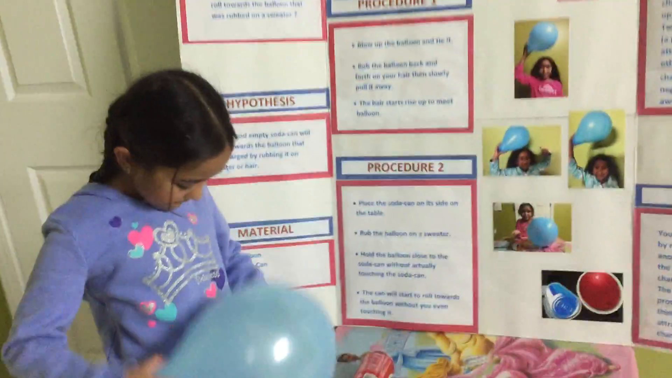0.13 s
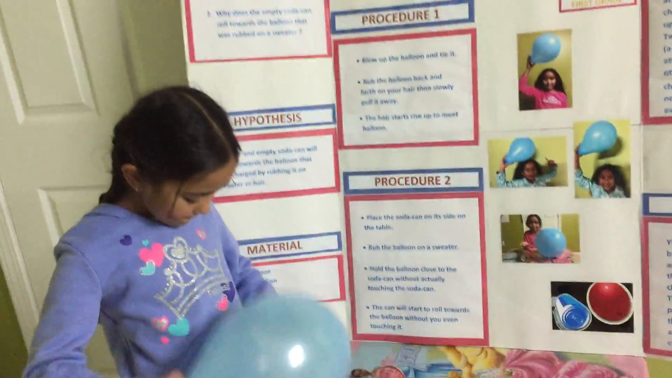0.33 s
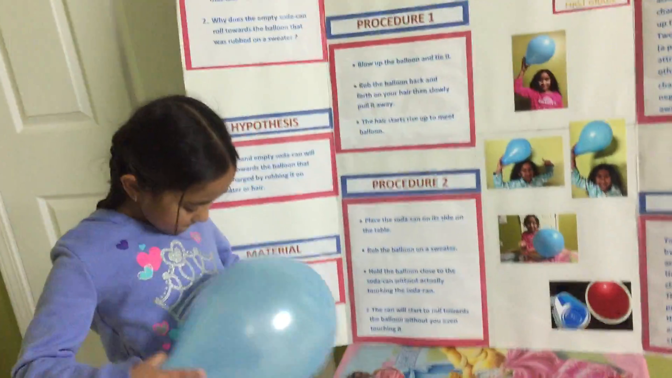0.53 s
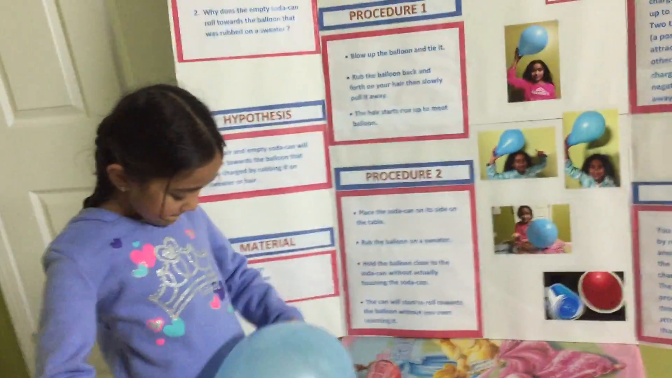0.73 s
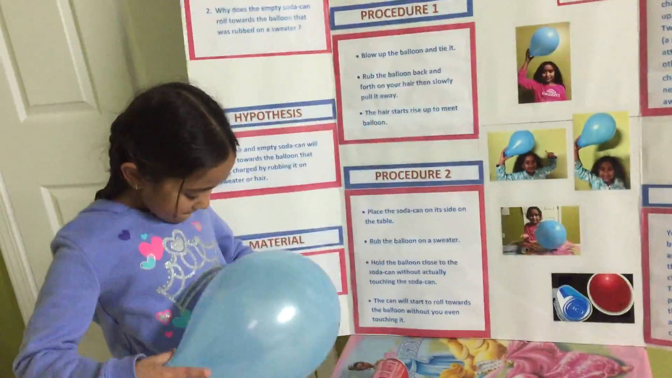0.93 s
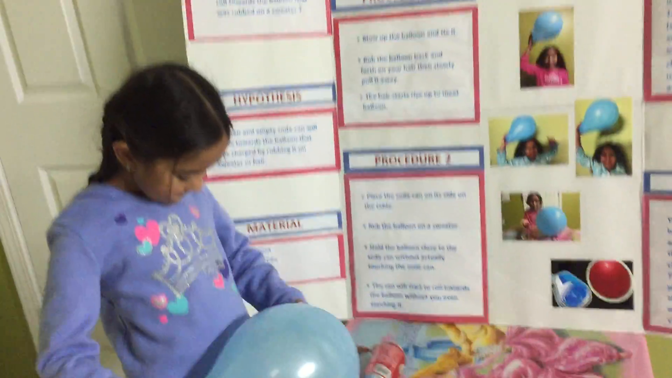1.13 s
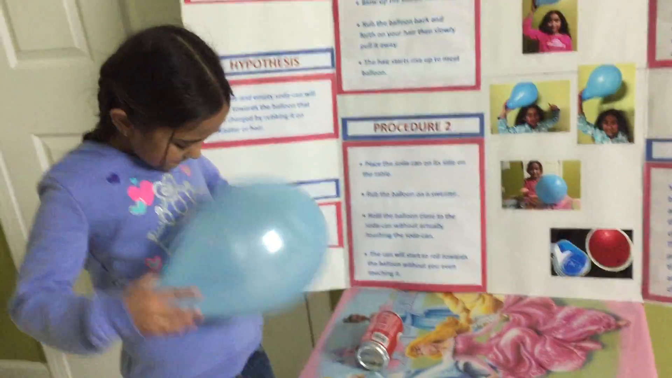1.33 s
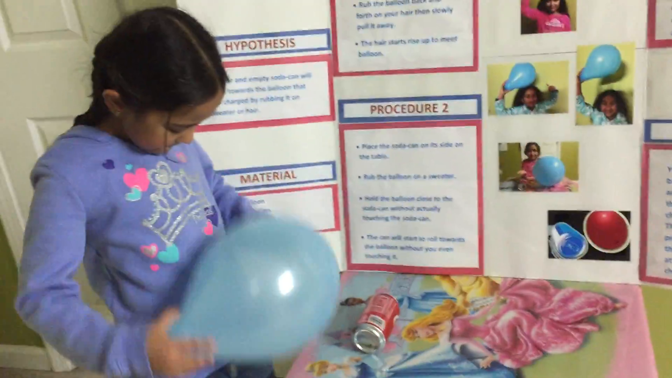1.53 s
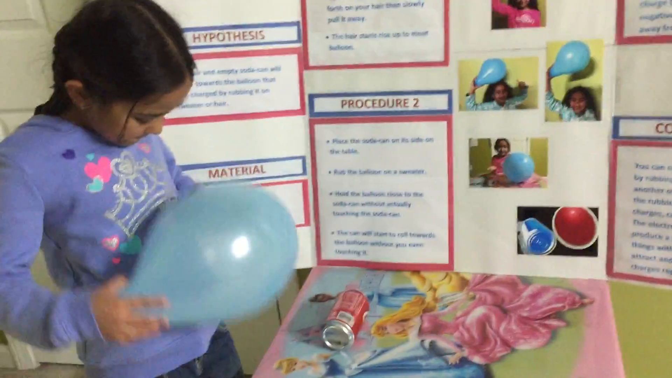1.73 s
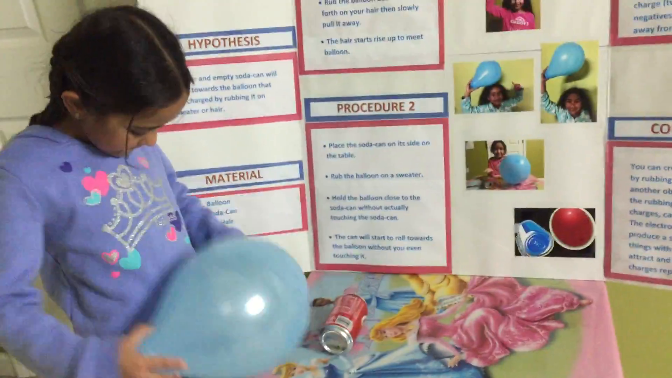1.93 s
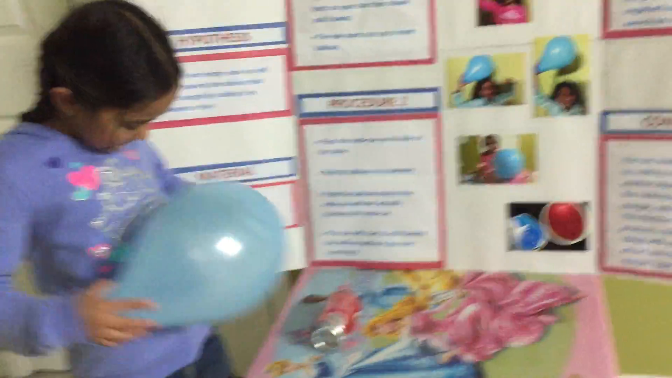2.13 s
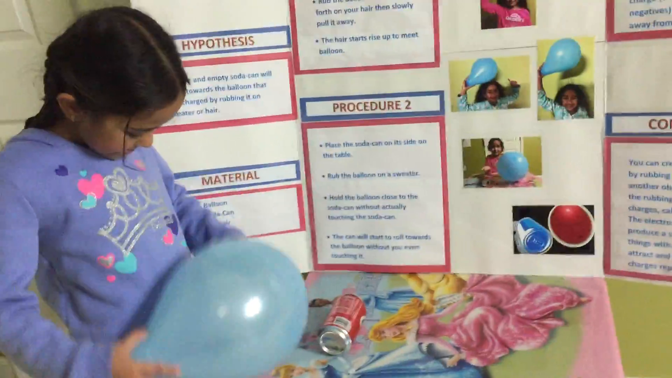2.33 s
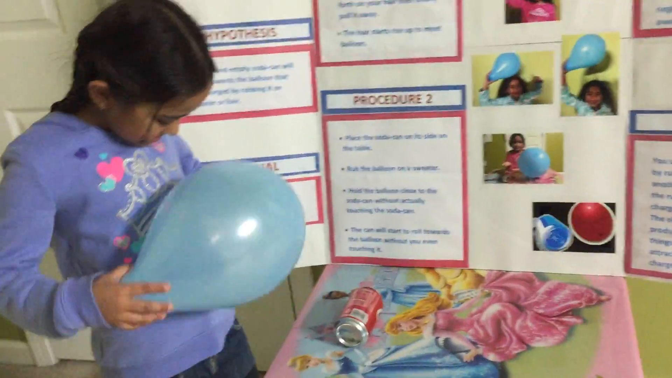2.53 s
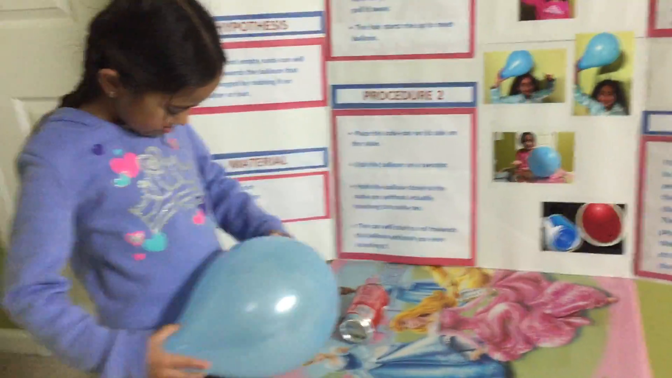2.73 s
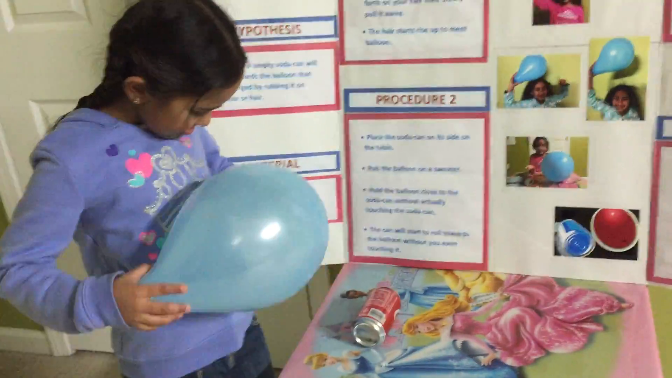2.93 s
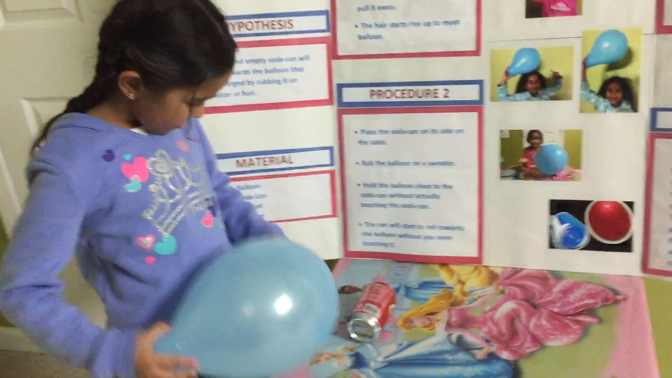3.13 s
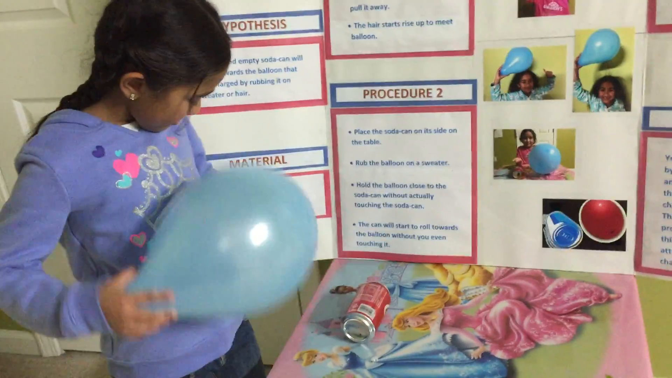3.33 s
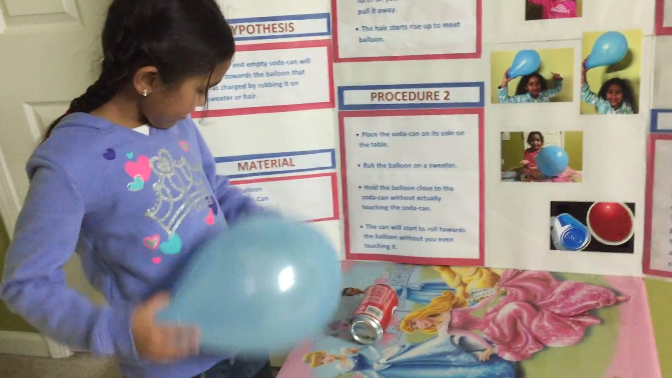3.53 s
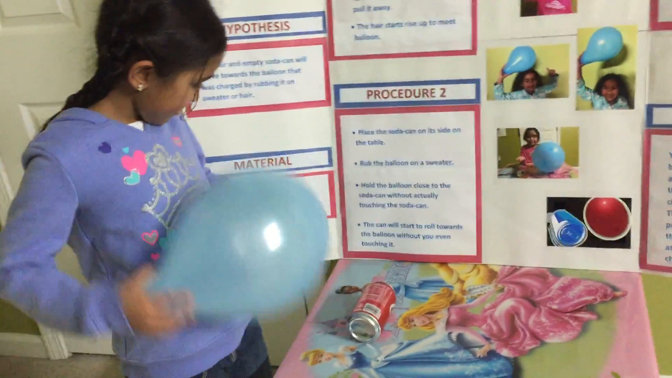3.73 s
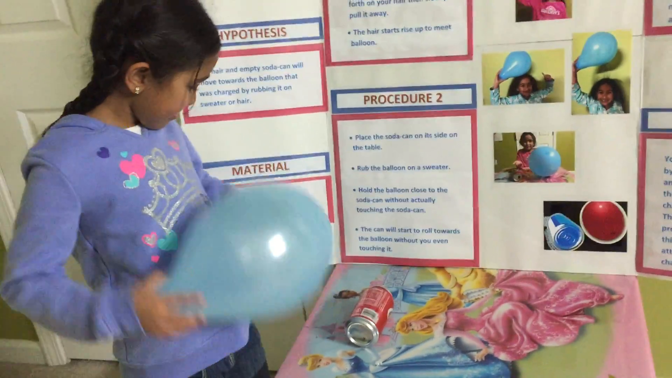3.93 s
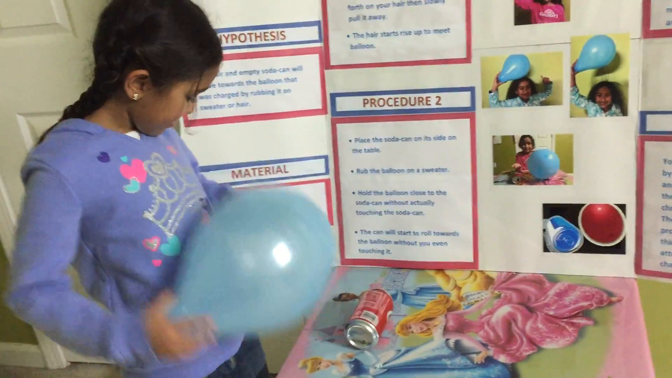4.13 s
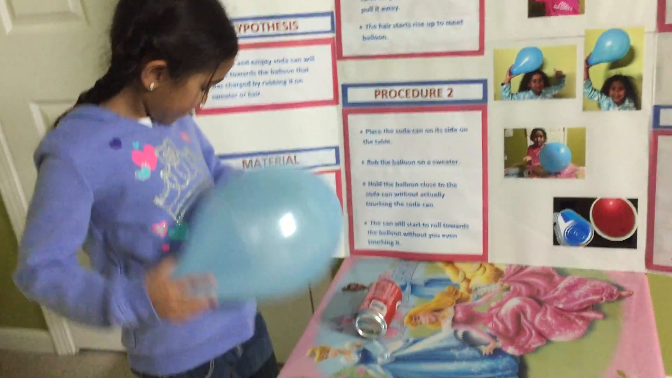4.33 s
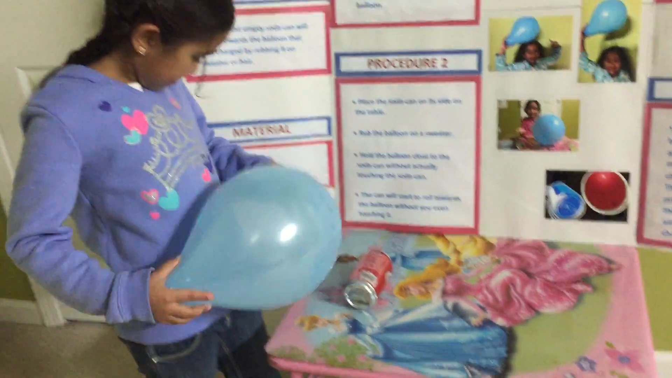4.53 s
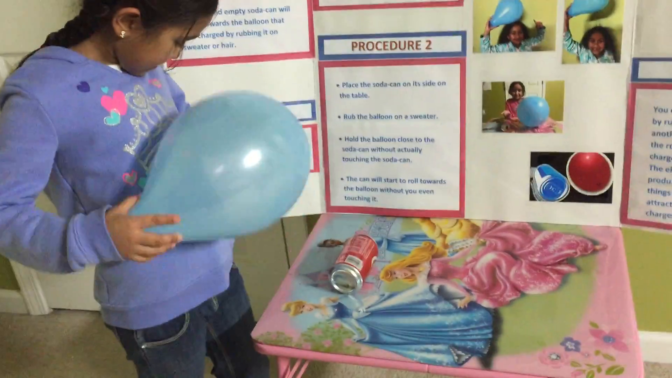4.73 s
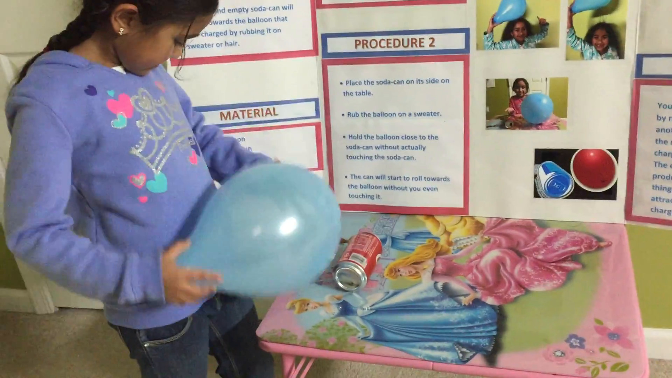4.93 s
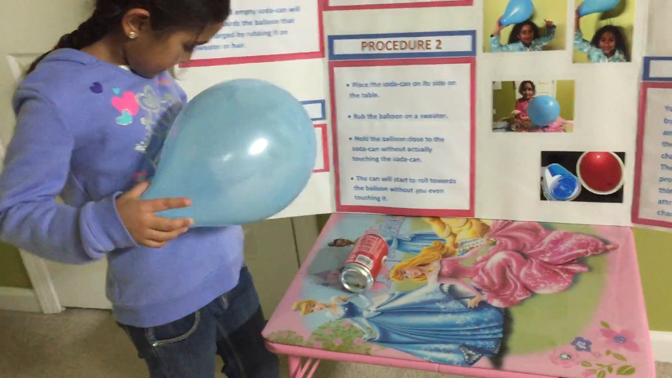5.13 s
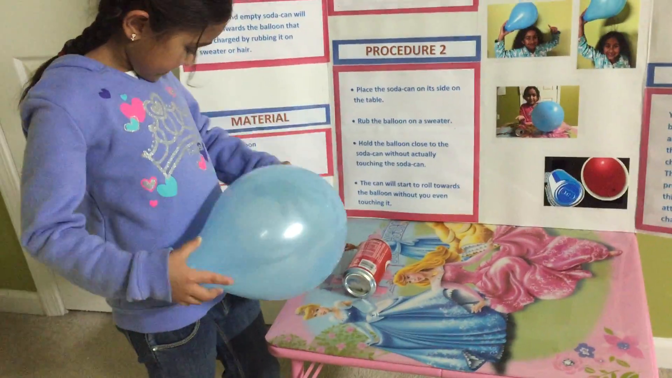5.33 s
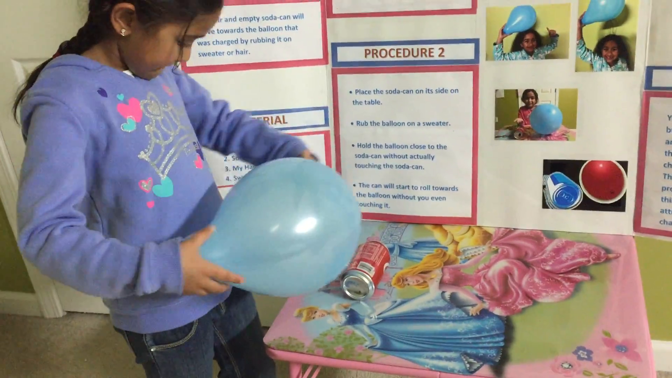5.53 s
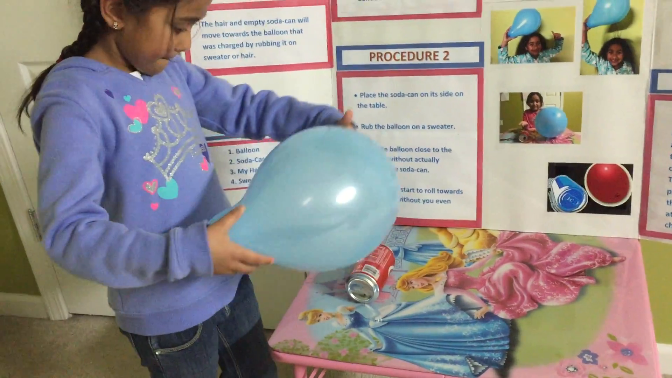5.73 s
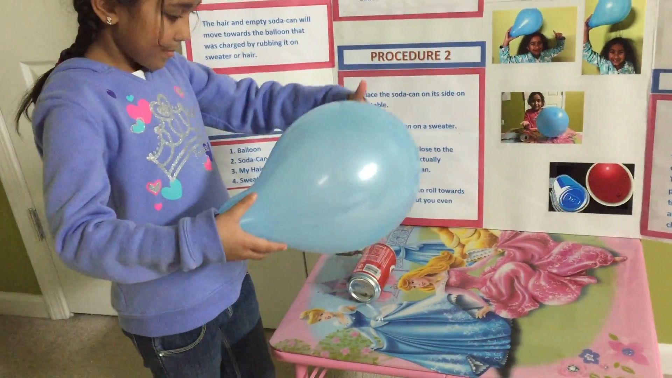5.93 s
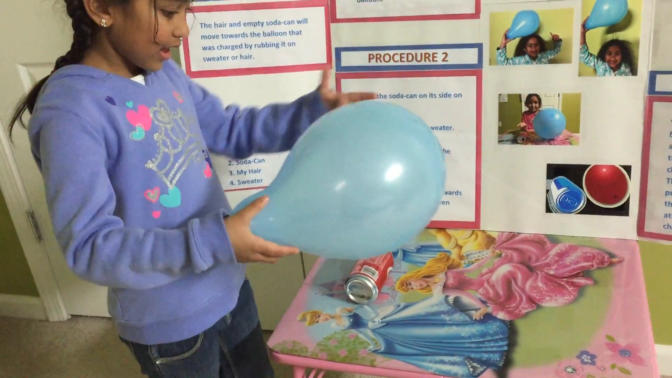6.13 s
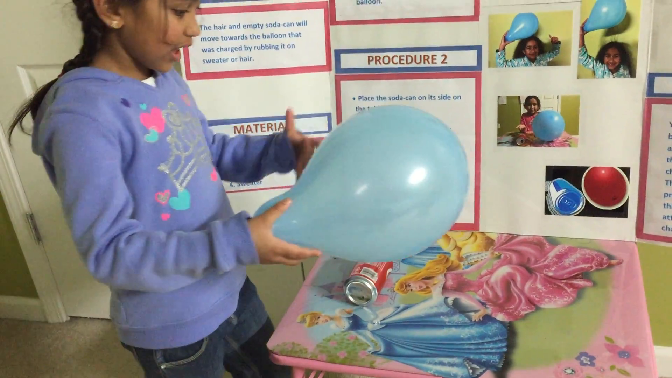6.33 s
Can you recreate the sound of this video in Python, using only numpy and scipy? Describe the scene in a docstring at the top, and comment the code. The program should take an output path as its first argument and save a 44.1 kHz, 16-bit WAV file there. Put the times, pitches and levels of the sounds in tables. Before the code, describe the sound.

An inflated balloon is rubbed quickly back and forth on a sweater, making scratchy hissing strokes with occasional rubbery creaks and snaps.

```python
"""A small room, one microphone close to a rubber balloon being rubbed on a knitted sweater.
Each stroke hisses as the fibres slide, rustles the stretched skin and sets the balloon murmuring or
bumping. Now and then the rubber sticks and lets go with creaks and snaps, with a loud cluster at the
end, when the hands change their grip. A short room tail and quiet air lie behind it."""
import sys
import numpy as np
from scipy import signal
from scipy.fft import rfft, irfft
from scipy.io import wavfile
from scipy.ndimage import map_coordinates

SR = 44100
rng = np.random.default_rng(int(sys.argv[2]) if len(sys.argv) > 2 else 0)


def store_wav(level_fs):
    """Save 16-bit WAV to argv[1]."""
    pcm = np.round(np.clip(np.atleast_2d(level_fs), -1, 1) * 32767)
    wavfile.write(sys.argv[1], SR, pcm.T.astype(np.int16))


N = 282151
HZ = np.fft.rfftfreq(N, 1 / SR)
STOP_S, BAND_LIMIT_HZ = 5.5, 15500  # end of the rubbing; top of the recorder's range

# down and up strokes in turn, each lasting until the next: (start [s], force [dB])
STROKES = [(-0.08, -0.5), (0.163, -0.5), (0.393, 0), (0.633, -.5), (0.867, -1), (1.11, -1), (1.301, -3),
           (1.526, 1.5), (1.744, 0), (1.953, 1), (2.143, 0), (2.334, 0.5), (2.514, 0.5), (2.703, -0.5),
           (2.895, 0), (3.09, -1), (3.256, -1), (3.443, -1), (3.618, -4), (3.806, 1.5), (3.98, 0),
           (4.18, .5), (4.369, -1), (4.55, -1), (4.721, -2), (4.895, 0), (5.07, .5), (5.286, 2)]
# the rubber lets go; weight (whole balloon shaken) and sharpness (crack) are relative to the skin:
# (time [s], skin level [dB], weight [dB], sharpness [dB], patch ring [Hz], flutter length [factor])
SNAPS = [(0.4905, -52, -9, -2, 1410, 1.2), (0.8935, -57.5, -13, 5, 6520, 1.1),
         (0.9073, -54.5, -20, 2, 1570, .7), (0.9178, -50.5, -6, 0, 1460, 1.2), (0.934, -53, -5, 2, 1460, 1),
         (0.95, -41, -24, -12, 2600, 0.66), (0.9552, -35.5, -7.5, -0.5, 1630, 0.7),
         (1.3858, -53.5, -13, 1, 2650, .9), (1.6018, -49, -25, -13, 2560, 0.9),
         (1.7741, -42.5, -7.5, -21, 2600, 1.6), (1.996, -46.5, -23, -11, 2580, .9),
         (2.011, -44, -21, -14, 3600, 0.62), (2.0242, -50, -4, 2, 4480, .6),
         (2.0449, -28.5, -2, 0, 920, 2.5), (2.048, -26, -8.5, -6.5, 2600, 1.5),
         (2.1838, -45, -15.5, -6.5, 2690, 1.7), (2.351, -52, -19, -10, 2720, .6),
         (2.3781, -43, -16, -9, 2470, 2.4), (2.5394, -53.5, 0.5, 6, 1490, 1),
         (2.548, -46.5, -11, -6, 1460, 1.1), (2.5575, -50.5, 0, 4.5, 1550, .5),
         (2.595, -47.5, -1, 4.5, 1500, 1.4), (3.2288, -63, 1, 10, 4220, 1), (3.2959, -54, -2, -9, 3000, 2),
         (3.7357, -57, -10, -6.5, 3600, 1.2), (4.021, -48.5, -4.5, -4, 2290, 2.1),
         (4.2238, -48.5, -9.5, -8, 2540, 1.1), (4.4052, -51, -7, -5, 1530, 1.2),
         (5.3515, -57.5, -7, 17, 3040, 2.5), (5.3536, -60, 1, 20, 3000, 1.5),
         (5.4014, -37.5, 8.5, 11.5, 920, 1.14), (5.5497, -52.5, 2, 9, 2430, .45),
         (5.5884, -32, -5, -7, 2380, 2.2), (5.64, -30.5, -4, -3.5, 1370, .67),
         (5.682, -42, -8, -20, 2330, 1), (5.7725, -41.5, -2, -2.5, 2340, 1.46),
         (5.9262, -53.5, -4, -5.5, 2340, 1.07), (6.1293, -87, -1, 19.5, 8350, 1)]
# the rubber judders; the burst from 2.074 s stands for the loud snap echoing off a wall:
# (start [s], end [s], level [dB])
CREAKS = [(0.873, 0.968, -55), (0.923, 1.025, -49.5), (1.593, 1.652, -62), (1.976, 2.066, -60.5),
          (2.074, 2.115, -45), (2.12, 2.224, -52), (2.508, 2.63, -55), (3.989, 4.06, -57),
          (4.385, 4.412, -55.5), (5.34, 5.382, -51), (5.425, 5.465, -43.5), (5.54, 5.656, -55.5),
          (5.65, 5.706, -47.5)]
# low booms of the balloon: the deep ones follow snaps, the higher ones come as a stroke pushes it into the
# body: (time [s], mode [Hz], level [dB])
BUMPS = [(0.485, 128, -56), (0.954, 148, -53), (1.619, 162, -60.5), (1.774, 330, -60), (2.047, 126, -39),
         (2.54, 336, -49), (2.989, 125.3, -63), (3.295, 332, -58.5), (4.019, 320, -57), (4.223, 340, -62.5),
         (4.399, 347, -63), (5.191, 133, -68.5), (5.403, 134, -41), (5.402, 297, -43), (5.64, 136, -45),
         (5.675, 75.4, -53)]
# spectrum of the wool hiss, with the microphone's dip near 10 kHz: (frequency [Hz], level [dB])
HISS_COLOUR = [(400, -23.5), (1000, -15), (1900, -8), (3000, -8.5), (4000, -6.5), (5000, -8), (5500, -1),
               (7000, -1), (8000, -2.5), (9800, 0.5), (10500, -3.5), (11600, 1), (15000, 1)]
# resonances of the stretched skin under the wool: (frequency [Hz], width [Hz], level [dB])
SKIN_MODES = [(1460, 160, 1.5), (2396, 370, -0.5), (2650, 370, -1.5), (3530, 1030, 1.5)]
# spectrum of the balloon's low murmur: (frequency [Hz], level [dB])
MURMUR_COLOUR = [(30, -23), (70, -7), (100, -2.5), (130, 9), (175, -10.5), (240, -1.5), (350, -11),
                 (520, -16.5), (900, -12), (2000, -49)]
# broad spectrum of one slip: (frequency [Hz], level [dB])
SLIP_COLOUR = [(30, -23.5), (70, -14.5), (130, 6), (350, -1.5), (540, -4), (750, -4), (1100, -5),
               (1800, -0.5), (2600, 0.5), (3500, -2.5), (4800, -7.5), (6500, -5), (10000, -13.5),
               (15000, -15)]
# modes of the balloon: (frequency [Hz], width [Hz], level over the slip spectrum [dB])
BALLOON_MODES = [(138, 15, 11), (310, 120, 3), (747, 24, -7), (876, 150, 8.5), (1110, 14, 4.5),
                 (1340, 20, 2.5), (1725, 23, -7), (2850, 42, -22), (3770, 13, 0.5)]
# reflections off the body, a table and a display board: (delay [s], gain [factor])
NEAR_ECHOES = [(.0011, -0.14), (.0029, 0.44), (.0036, 0.07), (.0055, 0.16), (.0074, -0.3), (0.0113, 0.25)]
# reverberation of the room: (frequency [Hz], time to fall 60 dB [s])
ROOM_DECAY = [(100, 0.039), (300, 0.33), (900, 0.3), (2300, 0.29), (5000, 0.27), (14000, 0.39)]
# spectrum of the quiet room: (frequency [Hz], level [dB])
AIR_COLOUR = [(15, -42), (25, -21.5), (54, -6.5), (202, -9.5), (243, -15.5), (286, -12), (373, -8.5),
              (475, -19.5), (691, -16), (769, -21), (1210, -20.5), (1460, -18), (15000, -30.5)]
# a down stroke bites early and pushes into the body, an up stroke gathers speed slowly:
# (timing [power, over 1 peaks late], pressure growth along the stroke [dB], extra murmur [dB])
DOWN, UP = (1, -2.4, 2.3), (1.194, 1, -.5)


def rubbing(turn_speed=0.035, grip=1.57):
    """Sliding speed arches over each stroke and drives fibre hiss, skin rustle and balloon murmur."""
    t = np.arange(N) / SR
    starts, force_db = np.transpose(STROKES)
    turns = np.append(starts, STOP_S)
    count, progress = np.divmod(np.interp(t, turns, np.arange(len(turns))), 1)
    stroke = np.minimum(count.astype(int), len(starts) - 1)
    timing, growth_db, push_db = np.array([DOWN, UP])[stroke % 2].T
    speed = (turn_speed + (1 - turn_speed) * np.sin(np.pi * progress ** timing)) * (t < STOP_S)
    pressure = amp(force_db[stroke] + growth_db * (progress - .5))
    hiss = amp(-51.5) * pressure * np.tanh(grip * speed ** 1.73)  # levels off in full slide
    hiss *= shaped(grains(per_s=14000, spread_db=1.5), colour(HISS_COLOUR) * (HZ < BAND_LIMIT_HZ))
    rustle = amp(-60.5) * pressure ** 1.5 * speed ** 1.35 * skin_rustle()
    reach = np.diff(turns)[stroke] / np.median(np.diff(turns))  # longer strokes shake the balloon more
    murmur = amp(-72.5 + push_db) * reach ** 1.4 * speed ** 0.64
    murmur *= shaped(rng.standard_normal(N), colour(MURMUR_COLOUR)) * waver(rate_hz=14, depth_db=2)
    knit = waver(rate_hz=46, depth_db=1)  # the ribs of the knit grip unevenly
    return chest_echo(knit * (hiss + rustle)) + murmur


def skin_rustle():
    """The contact patch wanders, so each resonance of the skin swells and fades on its own."""
    out = np.zeros(N)
    for hz, width, db in SKIN_MODES:
        swell = amp(db) * np.sqrt(width) * waver(rate_hz=16, depth_db=3)
        out += swell * shaped(grains(per_s=4100, spread_db=0), resonances([(hz, width, 0)], HZ))
    return unit(out)


def snaps(ring, creep_s=0.0034, flutter_s=0.002, patch_width_hz=560, patch_db=7, room_db=-12.5):
    """The rubber creeps, lets go in one sharp slip and flutters; each slipping patch has its own ring."""
    size, lead = 16384, SR // 100
    t, hz = (np.arange(size) - lead) / SR, np.fft.rfftfreq(size, 1 / SR)
    slip, damping = 1. * (t == 0), 1j * patch_width_hz * hz
    out = np.zeros(N)
    for s, db, weight_db, sharp_db, ring_hz, length in SNAPS:
        bands_db = db + np.array([weight_db - 3.5, weight_db - 1, 0, sharp_db])
        creep = 0.015 * np.exp(-abs(t) / creep_s)
        flutter = 0.14 * np.exp(-abs(t) / (flutter_s * length))
        shake = np.where(t < 0, creep, flutter) * rng.standard_normal(size)
        patch = 1 + amp(patch_db) * damping / (ring_hz ** 2 - hz ** 2 + damping)
        response = rfft(ring, size) * patch
        direct = slip_bands(near_echoes(irfft(rfft(slip + shake) * response)), bands_db, lead)
        # the room gathers the slip from all directions, which evens out its fine colour
        diffuse = room(slip_bands(irfft(rfft(slip) * response), bands_db, lead), build_s=0.0041)
        add(out, s - lead / SR, direct + amp(room_db) * diffuse)
    return out


def slip_bands(sound, levels_db, onset):
    """Sets a slip's deep thump, hollow body, skin and crack to their levels over its first 10 ms."""
    bands_hz = [(60, 480), (480, 1300), (1300, 4500), (4500, 15000)]
    out = np.zeros(len(sound))
    for k, (edges, db) in enumerate(zip(bands_hz, levels_db)):
        band = signal.sosfilt(signal.butter(2, edges, "band", fs=SR, output="sos"), sound)
        polarity = (-1) ** k  # opposite signs make neighbouring bands add at their edges
        out += polarity * amp(db) * band / np.std(band[onset:onset + SR // 100])
    return out


def creaks(ring, room_db=-9):
    """Runs of tiny uneven slips ring the balloon; one run stands for a snap's echo off a wall."""
    judder = near_echoes(signal.oaconvolve(grains(per_s=600, spread_db=2), ring)[:N])
    out = np.zeros(N)
    for start, end, db in CREAKS:
        run = judder[round(start * SR):round(end * SR)]
        add(out, start, amp(db) * unit(run * signal.windows.tukey(len(run), .6)))
    return out + amp(room_db) * room(out)


def balloon_ring(size=4096):
    """The balloon's modes ring after one slip, as a minimum-phase response."""
    hz = abs(np.fft.fftfreq(size, 1 / SR))
    log_gain = np.log(colour(SLIP_COLOUR, hz) * np.sqrt(1 + resonances(BALLOON_MODES, hz)))
    return np.fft.ifft(np.exp(signal.hilbert(log_gain).conj())).real[:size // 2]


def bumps(width_share=0.18, rise_s=0.0021, decay_s=0.015):
    """A soft, uneven jolt sets one low mode of the balloon booming."""
    out, t = np.zeros(N), np.arange(SR // 4) / SR
    for s, hz, db in BUMPS:
        push = rng.standard_normal(len(t)) * (1 - np.exp(-t / rise_s)) * np.exp(-t / decay_s)
        boom = signal.lfilter(*signal.iirpeak(hz, 1 / width_share, SR), push)
        boom = signal.sosfilt(signal.butter(2, 2 * hz, fs=SR, output="sos"), boom)
        add(out, s, amp(db) * boom / np.std(boom[t < 2 * decay_s]))
    return out


def chest_echo(x, near_s=.0005, travel_s=.0004, gain=0.087):
    """The echo off the chest comes earlier and later as the balloon moves up and down."""
    t, turns = np.arange(N) / SR, [start for start, _ in STROKES]
    height = np.cos(np.pi * np.interp(t, turns, np.arange(len(turns)))) / 2 + .5
    return x + gain * map_coordinates(x, [(t - near_s - travel_s * height) * SR])


def near_echoes(x, drift=.07):
    """Nearby surfaces repeat a sound, with delays that vary a little with the balloon's place."""
    out = x.copy()
    for delay, gain in NEAR_ECHOES:
        add(out, delay * (1 + drift * rng.standard_normal()), gain * x)
    return out


def room(x, build_s=0.0047, dull_hz=7200, top_db=-11, far_wall_s=0.062):
    """A diffuse tail builds, swells again off the far wall and dies band by band."""
    t = np.arange(SR // 2) / SR
    hz, age_s, bands = signal.stft(rng.standard_normal(len(t)), SR, nperseg=256)
    bands *= amp(-60 * age_s / curve(ROOM_DECAY, hz)[:, None])
    treble = 1 / (1 + (dull_hz / (hz[:, None] + 1)) ** 20)  # the top octave arrives mostly direct
    tail = signal.istft(bands * amp(top_db * treble), SR, nperseg=256)[1][:len(t)]
    tail *= 1 - np.exp(-(t / build_s) ** 2)
    tail *= 1 + 0.25 * np.exp(-((t - far_wall_s) / 0.0036) ** 2)
    return signal.oaconvolve(x, tail / np.linalg.norm(tail))[:len(x)]


def room_tone(level_db=-72):
    """The steady, faint air of the room."""
    return amp(level_db) * shaped(rng.standard_normal(N), colour(AIR_COLOUR) * (HZ < BAND_LIMIT_HZ))


def grains(per_s, spread_db):
    """Random tiny clicks, most small, a few large."""
    size = amp(spread_db * np.minimum(rng.exponential(1, N), 4))
    return unit(size * rng.standard_normal(N) * (rng.random(N) < per_s / SR))


def waver(rate_hz, depth_db):
    """A random gain that drifts up to the given rate."""
    return amp(depth_db * shaped(rng.standard_normal(N), 1 / (1 + (HZ / rate_hz) ** 4)))


def resonances(modes, hz):
    """Summed power response of (frequency [Hz], width [Hz], level [dB]) modes."""
    return sum(amp(db) ** 2 / (1 + ((hz ** 2 - f ** 2) / (width * hz + 1)) ** 2)
               for f, width, db in modes)


def curve(points, hz):
    """Joins (frequency [Hz], value) points on a log-frequency axis."""
    f, value = np.transpose(points)
    return np.interp(np.log(hz + 1), np.log(f + 1), value)


def colour(points, hz=HZ):
    """Gain at each frequency of a spectrum given in dB."""
    return amp(curve(points, hz))


def shaped(x, gain):
    """Gives a full-length signal a spectrum, at rms 1."""
    return unit(irfft(rfft(x) * gain, N))


def amp(db):
    """Decibels to amplitude."""
    return 10 ** (np.asarray(db) / 20)


def unit(x):
    """Scales to rms 1."""
    return x / np.sqrt(np.mean(x ** 2) + 1e-20)


def add(mix, s, sound):
    """Mixes a sound in at time s."""
    part = mix[round(s * SR):][:len(sound)]
    part += sound[:len(part)]


def scene(room_db=-13):
    """Rubbing, bumps, snaps and creaks at the microphone, in mono, over the room tone."""
    ring = balloon_ring()
    rub = rubbing() + bumps()
    air = room_tone()
    return (snaps(ring) + creaks(ring) + rub + amp(room_db) * room(rub) + air)[None]


def record(dry):
    """The recorder's band limit."""
    low_pass = signal.firwin(401, BAND_LIMIT_HZ, window=("kaiser", 8), fs=SR)
    return signal.oaconvolve(dry, low_pass[None], "same")


dry = scene()
out = record(dry)
store_wav(out)
```